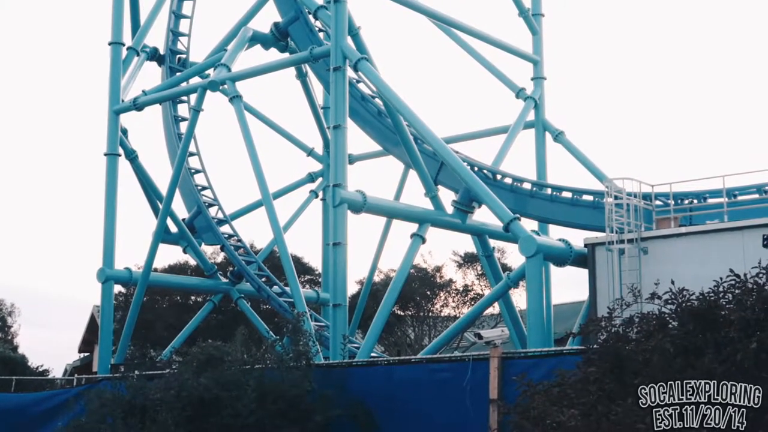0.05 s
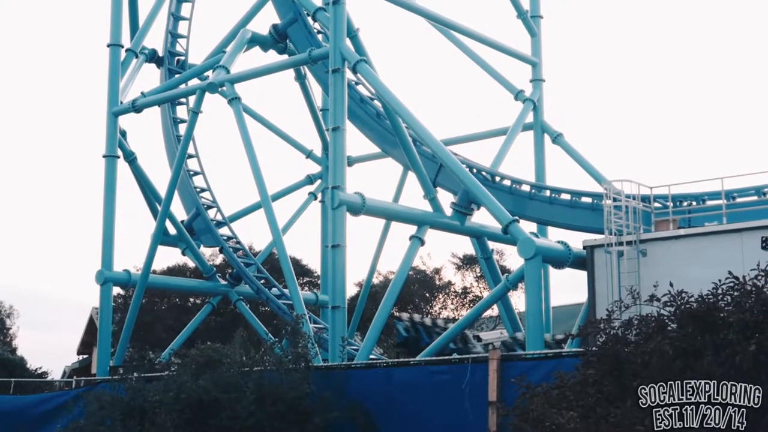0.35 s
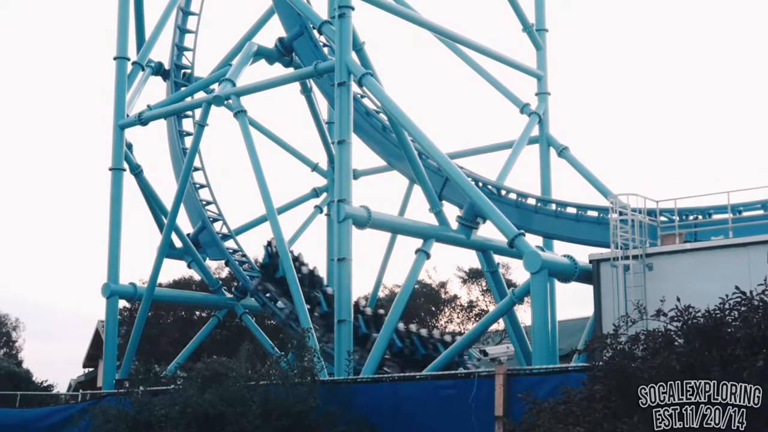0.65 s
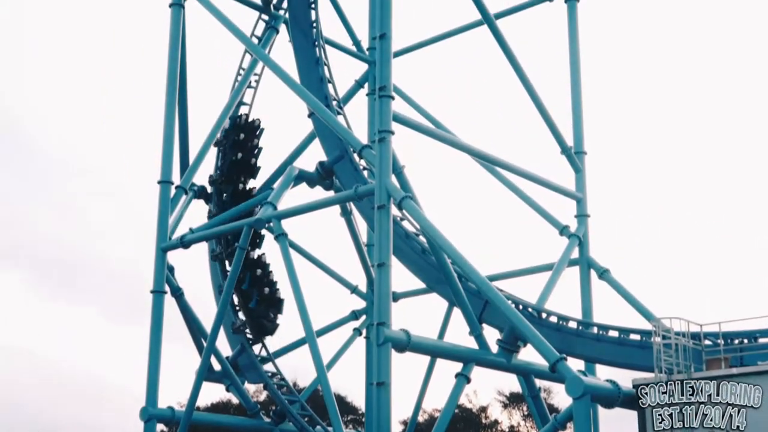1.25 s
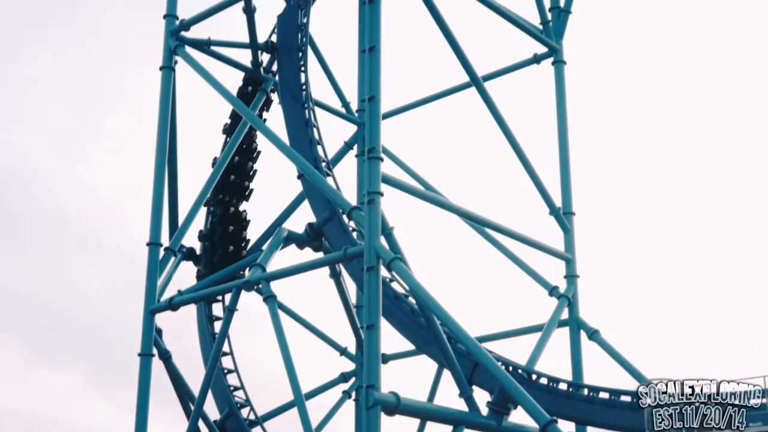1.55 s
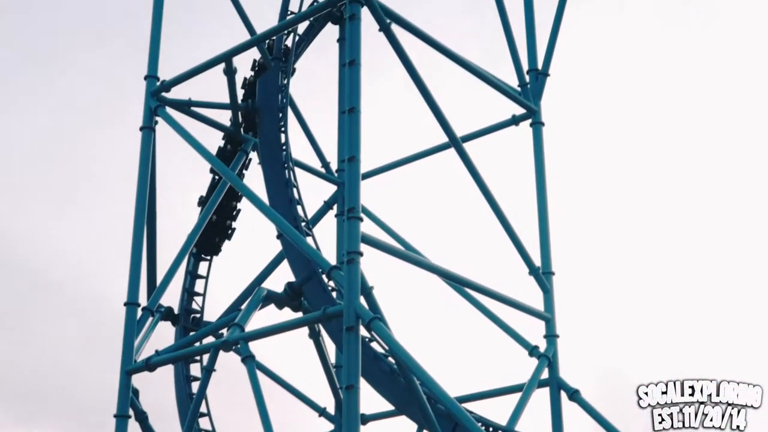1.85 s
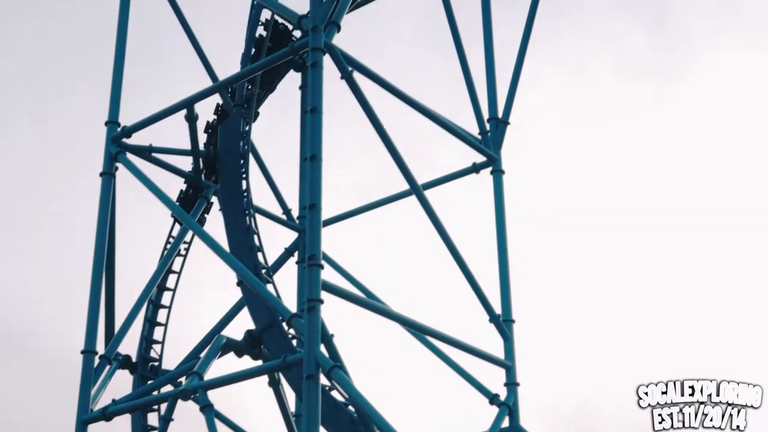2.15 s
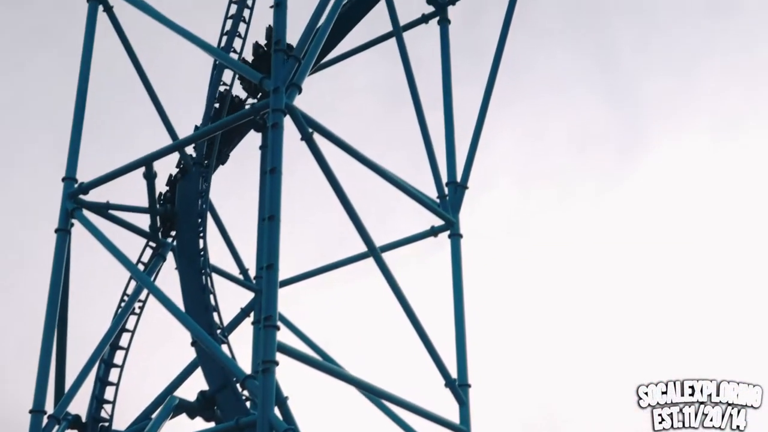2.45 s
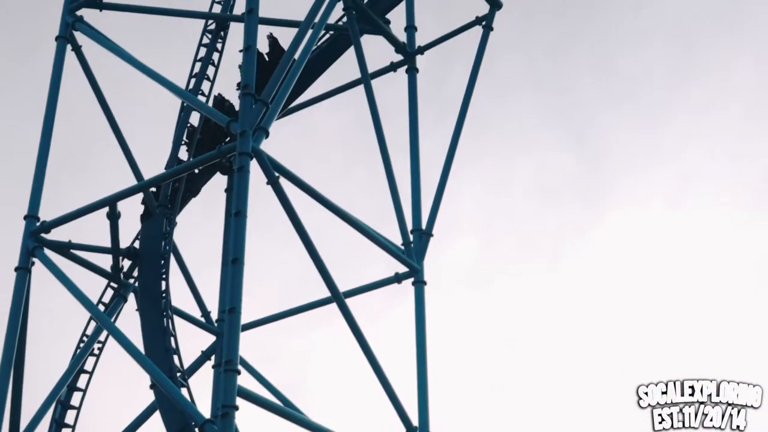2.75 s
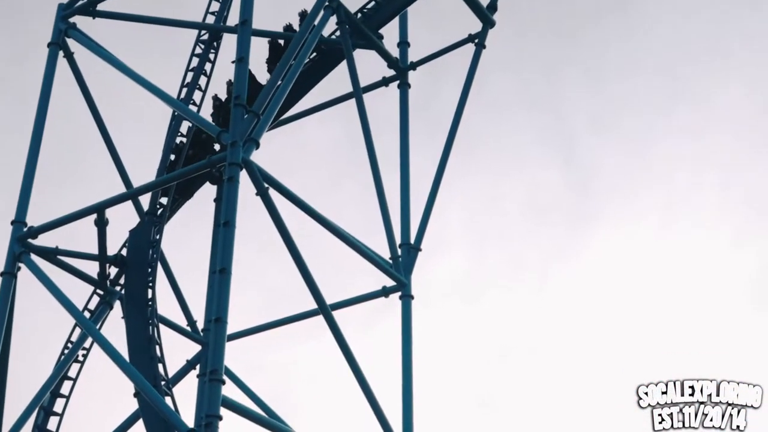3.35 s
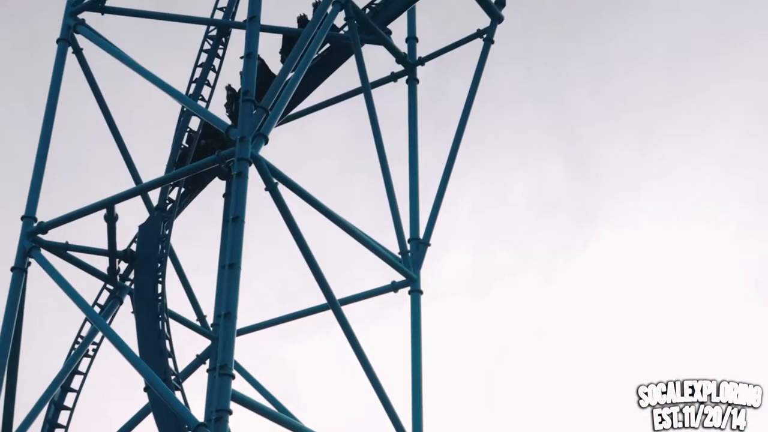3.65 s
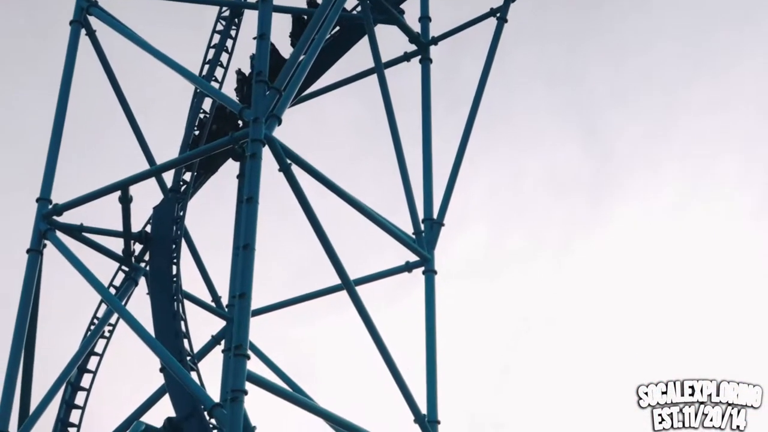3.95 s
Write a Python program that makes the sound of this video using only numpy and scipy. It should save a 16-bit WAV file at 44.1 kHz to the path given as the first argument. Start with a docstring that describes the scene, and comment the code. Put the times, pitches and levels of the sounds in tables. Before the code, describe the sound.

A roller coaster train roars and throbs along hollow steel track over a deep rumble and rushing air, heard outdoors from the ground. The wheels sing briefly in the first second. Faint squeaks come between 2.5 and 3 seconds, with a low tone lasting until about 3.4. The rush grows brighter as the roar eases, and a steady hum enters near 3.7 seconds. Three faint ticks are scattered throughout.

```python
"""A roller coaster train sweeps through a dip and climbs a steel tower, heard outdoors from the ground.
From the start, its wheels make the hollow track roar and throb over a deep rumble and a rush of air.
In the first second the wheels sing briefly in the dip, and the first of three faint ticks is heard.
Past halfway come faint squeaks and a low tone, and the rush brightens as the train turns overhead.
Near the end a steady hum sets in."""
import sys
import numpy as np
from scipy import signal
from scipy.fft import rfft, irfft
from scipy.io import wavfile
from scipy.ndimage import uniform_filter1d

SR = 44100
rng = np.random.default_rng(int(sys.argv[2]) if len(sys.argv) > 2 else 0)


def store_pcm(level_fs):
    """Save levels as 16-bit WAV."""
    pcm = np.round(np.clip(level_fs, -1, 1) * 32767).astype(np.int16)
    wavfile.write(sys.argv[1], SR, np.atleast_2d(pcm).T)


N = 176400
TIME = np.arange(N) / SR

# How loud the deep rumble is: time_s, level_db
RUMBLE_LOUDNESS = [(0, -21), (.2, -23.5), (.42, -20.5), (.6, -26.5), (1.7, -26), (2.0, -22), (2.2, -27),
                   (2.48, -24.5), (2.85, -25.5), (3.1, -23.5), (3.3, -26.5), (3.55, -21.5), (4, -28.5)]
# The rumble's mix of low and high: pitch_hz, relative_db
RUMBLE_COLOUR = [(20, -21), (32, -16.5), (45, -15.5), (62, -2.5), (85, -7), (120, -3.5), (200, -7),
                 (400, -22.5)]

# The track's main ringing note: time_s, pitch_hz, level_db
ROAR_PATH = [(0, 321.4, -18), (.35, 325, -16.5), (.6, 328.7, -16), (1.35, 327.9, -15), (1.85, 312, -17),
             (2.5, 303.5, -17), (2.9, 315.4, -17.5), (3.4, 309.6, -21.5), (4, 300, -22.5)]
# Other notes, each swelling on one stretch of track: peak_s, spread_s, pitch_hz, width_hz, level_db
TRACK_SWELLS = [(.25, 0.21, 150.2, 35, -26), (1.1, 0.38, 146, 25, -26), (2.35, 0.55, 155.2, 19.5, -24.5),
                (2.5, 0.27, 235, 42, -26), (3.501, 0.94, 210, 36, -28.5), (0.87, 0.37, 224, 30.3, -28),
                (0.67, .22, 766, 65, -26.3), (0.76, 0.3, 618, 83, -27.5), (.42, 0.15, 878, 29, -34.5),
                (.96, 0.037, 2100, 1300, -36), (1.42, 0.23, 910, 49, -36), (2.799, .5, 116, 48, -29)]
# The heaviest throbs, added on top of the roar: time_s, level_db
HEAVY_THROBS = [(0.069, -17.5), (0.517, -17.5), (.61, -23), (0.799, -22), (1.209, -19.5), (1.285, -21.5),
                (1.39, -20), (1.663, -16.5), (1.74, -16.5), (1.99, -23.5), (2.125, -21), (2.335, -22),
                (2.585, -20.5), (2.76, -20.5), (2.92, -17.5), (3.335, -22.5)]

# How the rush of wheels and air rises and falls: time_s, relative_db
RUSH_LOUDNESS = [(0, -29), (.2, -31.5), (.4, -30.5), (1.1, -36), (1.9, -33), (2.5, -31), (3.15, -28),
                 (3.47, -23.5), (3.66, -25.2), (4, -24.5)]
# How its high hiss rises and falls: time_s, relative_db
HISS_LOUDNESS = [(0, -38), (.35, -37.5), (.8, -41.5), (1.5, -43), (2.1, -42.5), (2.6, -39), (3.1, -36),
                 (3.45, -33.5), (4, -33.5)]
# The rush's mix of low and high: pitch_hz, relative_db
RUSH_COLOUR = [(200, 3), (450, 2.5), (750, 2.5), (1000, 1.5), (1400, -2.5), (2000, -9.5), (3000, -21),
               (5000, -46.5)]
# The same for the hiss: pitch_hz, relative_db
HISS_COLOUR = [(1000, -21.5), (1800, -7), (2600, 2), (4000, -6), (5500, -16), (7000, -4.5), (10000, -21),
               (16000, -23.5)]
# The same for the sizzle, the finest hiss: pitch_hz, relative_db
SIZZLE_COLOUR = [(3500, -1.5), (5500, 4.5), (7000, -4), (10000, -3.5), (13000, -9.5), (16000, -15.5)]
# How late the rush's echo arrives as the train moves: time_s, delay_ms
ECHO_DELAY = [(0, 3.5), (.7, 1.46), (1.5, 1.96), (2.5, 3.8), (4, 7.64)]

# Notes sung by wheels and tower, the hum last: start_s, end_s, start_hz, end_hz, level_db
SINGING_NOTES = [(0.12, 0.54, 441.5, 449, -28), (.15, .52, 992, 1003, -38.5), (.42, .56, 758, 755, -31.5),
                 (0.555, 1.072, 484.5, 470.8, -29.5), (.66, .81, 758.5, 723, -28.5),
                 (2.55, 3.443, 325.6, 343, -28), (3.679, 4.1, 378.6, 371.5, -20)]
# Faint high ticks: time_s, pitch_hz, level_db
HIGH_TICKS = [(.357, 6000, -31), (1.812, 12500, -39), (3.917, 11500, -33)]
# Faint distant squeaks: start_s, end_s, start_hz, end_hz, level_db
FAR_SQUEAKS = [(2.452, 2.535, 2130, 1700, -37), (2.705, 2.745, 1604, 1660, -36),
               (2.89, 2.935, 1564, 1506, -35.5)]

# How far the wave on the left side runs ahead of the right: pitch_hz, lead_radians
LEFT_LEAD = [(900, .03), (1500, 0.27), (2200, 0.36), (4200, 1.23), (6000, 1.88), (8000, 2.58)]
# How much louder the left side is than the right: pitch_hz, louder_db
LEFT_LOUDER = [(400, 0), (900, 1.5), (1500, 4.5), (2300, 5), (3600, 4), (5600, 2)]
# Scattered sound, unlike on the two sides, compared with the direct sound: pitch_hz, relative_db
SCATTERED_SHARE = [(90, -56.5), (230, -35), (370, -26.5), (600, -22.5), (1400, -15.5), (2300, -7),
                   (5600, -5), (10000, -12)]


def from_db(db):
    """Turn decibels into a number to multiply by."""
    return 10 ** (np.asarray(db) / 20)


def rms_one(x):
    """Scale a sound so that its average strength (rms) is 1."""
    return x / np.sqrt(np.mean(x ** 2) + 1e-20)


def steady(x, span_s=.16):
    """Hold a noise at strength 1 over the given span, leaving its faster flutter."""
    size = int(span_s * SR)
    power = uniform_filter1d(uniform_filter1d(x ** 2, size), size)
    return x / np.sqrt(power + 1e-20)


def over_time(rows):
    """Join a table's points with straight lines: one curve for each column after the time."""
    times, *columns = np.transpose(rows)
    return [np.interp(TIME, times, column) for column in columns]


def at_pitch(rows, hz):
    """Read a table's value at the given pitches."""
    pitches, values = np.transpose(rows)
    return np.interp(np.log(np.maximum(hz, 1)), np.log(pitches), values)


def bump(peak_s, spread_s):
    """A smooth rise and fall."""
    return np.exp(-.5 * ((TIME - peak_s) / spread_s) ** 2)


def drift(rate_hz):
    """A slow random wobble of strength 1, worked out once every 40 samples."""
    memory = np.exp(-2 * np.pi * rate_hz * 40 / SR)
    noise = rng.standard_normal(N // 40 + 2002)
    slow = signal.lfilter([1], [1, -2 * memory, memory ** 2], noise)[2000:]
    return np.interp(np.arange(N) / 40, np.arange(len(slow)), rms_one(slow))


def noise_band(low_hz, high_hz):
    """Fresh noise between two pitches."""
    sos = signal.butter(2, [low_hz, high_hz], "band", fs=SR, output="sos")
    return signal.sosfilt(sos, rng.standard_normal(N + SR // 10))[-N:]


def ringing(hz, width_hz):
    """Something shaken at random rings around one pitch; the narrower, the clearer the note."""
    low_hz = np.hypot(hz, width_hz / 2) - width_hz / 2
    return rms_one(noise_band(low_hz, low_hz + width_hz))


def coloured_noise(colour, flicker_db=1.82):
    """Noise of strength 1, built from half-octave bands that each flicker on their own."""
    out = 0
    edges_hz = 18 * 2 ** np.arange(0, 10.1, .5)
    for low, high in zip(edges_hz, edges_hz[1:]):
        hz = np.sqrt(low * high)
        if colour[0][0] / 2 < hz < colour[-1][0] * 2:
            level_db = at_pitch(colour, hz) + flicker_db * drift(19.6)
            out += from_db(level_db) * noise_band(low, high)
    return steady(out)


def rumble():
    """The tower rumbles under the weight of the train."""
    return from_db(over_time(RUMBLE_LOUDNESS)[0]) * coloured_noise(RUMBLE_COLOUR)


def track_roar(beat_depth_db=1):
    """The hollow track rings and throbs under the wheels, and its pitch sinks as the train slows."""
    hz, level_db = over_time(ROAR_PATH)
    centre_hz = hz.mean()
    core = ringing(centre_hz, width_hz=79)
    fringe = from_db(-3.5) * ringing(centre_hz, width_hz=217)
    # Multiplying these two slides the whole ringing up or down in pitch.
    glide = np.exp(2j * np.pi * np.cumsum(hz - centre_hz) / SR)
    ring = signal.hilbert(steady(core + fringe, span_s=.07)) * glide
    return from_db(level_db + beat_depth_db * wheel_beat()) * ring.real + heavy_throbs(ring)


def wheel_beat(beats_per_s=11.3):
    """The wheels press on the track in an uneven beat, -1 to 1, that peaks on every heavy throb."""
    peaks_s = [0] + [time_s for time_s, _ in HEAVY_THROBS] + [N / SR]
    beats_per_gap = np.maximum(np.round(np.diff(peaks_s) * beats_per_s), 1)
    beats_so_far = np.append(0, np.cumsum(beats_per_gap))
    return np.cos(2 * np.pi * np.interp(TIME, peaks_s, beats_so_far))


def heavy_throbs(ring):
    """The heaviest wheel loads push the track harder, in step with its ringing."""
    pushes = sum(from_db(db) * bump(time_s, spread_s=.01) for time_s, db in HEAVY_THROBS)
    evened_ring = rms_one(ring.real / np.hypot(np.abs(ring), .5))
    return pushes * evened_ring


def track_swells():
    """Other notes of the track swell and fade as the train crosses each stretch."""
    return sum(from_db(db) * bump(peak_s, spread_s) * steady(ringing(hz, width_hz))
               for peak_s, spread_s, hz, width_hz, db in TRACK_SWELLS)


def rush(rush_gain_db=5.5, hiss_gain_db=1.5, sizzle_db=-44, echo_db=-16.5):
    """Wheels and air rush, hiss and sizzle; a faint, shifting echo colours the noise."""
    rush_db, = over_time(RUSH_LOUDNESS)
    hiss_db, = over_time(HISS_LOUDNESS)
    # The sizzle swings further than the hiss as the train turns toward the listener.
    swing_db = 1.28 * (hiss_db - hiss_db.mean())
    body = from_db(rush_db + rush_gain_db) * coloured_noise(RUSH_COLOUR)
    hiss = from_db(hiss_db + hiss_gain_db) * coloured_noise(HISS_COLOUR)
    sizzle = from_db(sizzle_db + swing_db) * coloured_noise(SIZZLE_COLOUR)
    direct = body + hiss + sizzle
    delay_ms, = over_time(ECHO_DELAY)
    echo = np.interp(TIME - delay_ms / 1000, TIME, direct)
    return direct + from_db(echo_db) * echo


def sliding_notes(rows, wander_hz, fade_s=.014, flicker_db=1.36, octave_db=-21):
    """Slightly shaky notes that slide in pitch, each with a weak copy an octave higher."""
    out = 0
    for start_s, end_s, start_hz, end_hz, db in rows:
        hz = np.interp(TIME, [start_s, end_s], [start_hz, end_hz]) + wander_hz * drift(9.5)
        phase = 2 * np.pi * np.cumsum(hz) / SR
        note = rms_one(np.sin(phase) + from_db(octave_db) * np.sin(2 * phase))
        fade = np.clip(np.minimum(TIME - start_s, end_s - TIME) / fade_s + .5, 0, 1)
        out += fade * from_db(db + flicker_db * drift(10)) * note
    return out


def singing():
    """The wheels and tower sing briefly in the dip and hum later on."""
    return sliding_notes(SINGING_NOTES, wander_hz=1.29)


def ticks(decay_s=.002):
    """Tiny bright clicks that die away within milliseconds."""
    out = 0
    for time_s, hz, db in HIGH_TICKS:
        fade = (TIME >= time_s) * np.exp(-np.abs(TIME - time_s) / decay_s)
        out += from_db(db) * fade * ringing(hz, width_hz=3500)
    return out


def squeaks():
    """Short, high, wavering squeaks sound faintly in the distance."""
    return sliding_notes(FAR_SQUEAKS, wander_hz=7.3)


def mix():
    """Rumble, roar, rush, notes and squeaks, added together with faint high clicks."""
    return rumble() + track_roar() + track_swells() + rush() + singing() + squeaks() + ticks()


def scene(opposite_hz=8800):
    """The train in stereo: centred in the bass, very wide in the highest hiss."""
    hz = np.arange(N + 1) * SR / (2 * N)
    side = np.array([[1], [-1]])  # left, right
    lead = at_pitch(LEFT_LEAD + [(opposite_hz, np.pi)], hz)
    louder_db = at_pitch(LEFT_LOUDER + [(opposite_hz, 0)], hz)
    # Both shrink toward zero below the first pitch in their tables.
    lead *= np.minimum(hz / LEFT_LEAD[0][0], 1) ** 2
    louder_db *= np.minimum(hz / LEFT_LOUDER[0][0], 1) ** 2
    direct = rfft(mix(), 2 * N) * from_db(side * louder_db / 2) * np.exp(.5j * side * lead)
    scattered = rfft(mix(), 2 * N) * from_db(at_pitch(SCATTERED_SHARE, hz))
    return irfft(direct + side * scattered)[:, :N]


def record(dry):
    """Cut away the very highest treble."""
    cutoff_hz = 14900
    return signal.sosfilt(signal.ellip(10, .1, 80, cutoff_hz, fs=SR, output="sos"), dry)


dry = scene()
out = record(dry)
store_pcm(out)
```